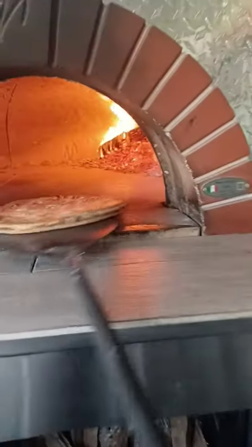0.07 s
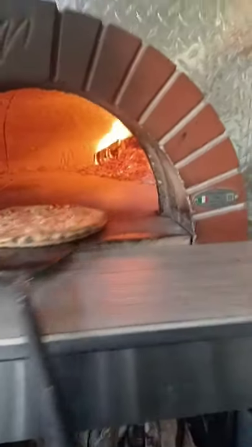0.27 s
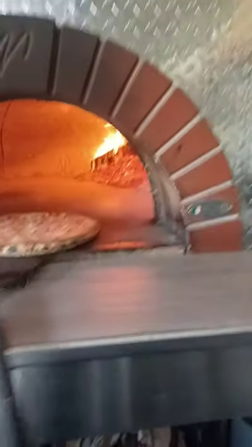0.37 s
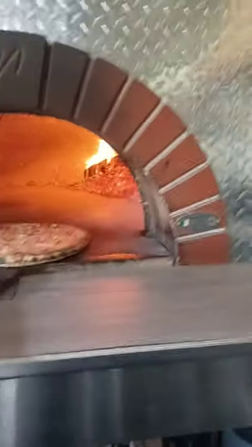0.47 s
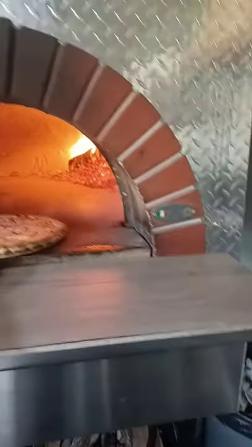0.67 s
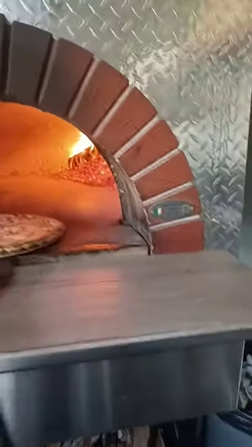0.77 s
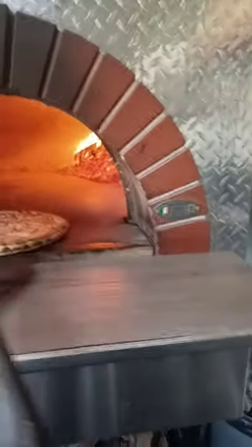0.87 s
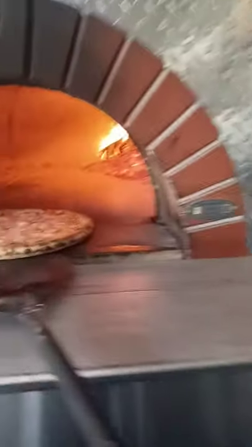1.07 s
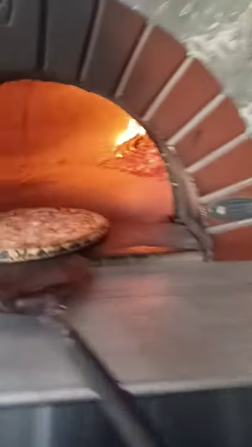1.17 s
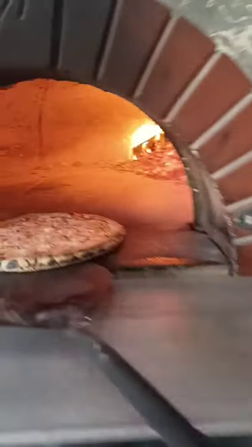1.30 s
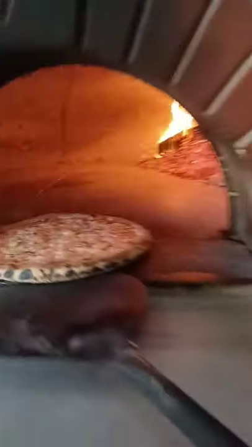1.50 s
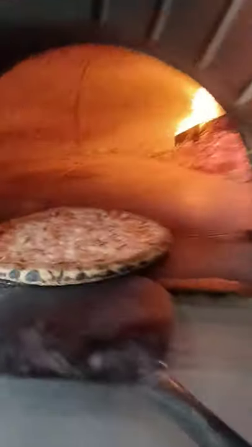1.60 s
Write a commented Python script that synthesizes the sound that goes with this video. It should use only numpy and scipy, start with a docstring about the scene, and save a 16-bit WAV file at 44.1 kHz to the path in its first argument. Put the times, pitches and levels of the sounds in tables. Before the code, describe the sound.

Close by in a small kitchen, a metal blade rasps along a steel counter, pauses briefly with a tiny tick, scrapes again brighter and hissier, then stops; quiet rumble and one soft last brush follow.

```python
"""In a kitchen with a wood oven, a metal pizza peel slides twice over a steel ledge, then brushes it once.
Random clicks of grit are filtered into a rasp and a treble hiss, and they ring the blade's high modes.
Grit also rings the ledge's lower modes, and a wavering sine makes it sing while the blade presses.
Filtered noise gives the air and rumble behind, with two soft thumps; two microphone ports hear it all."""
import sys
import numpy as np
from scipy import signal
from scipy.fft import rfft, irfft
from scipy.io import wavfile
from scipy.ndimage import uniform_filter1d

SR = 44100
rng = np.random.default_rng(int(sys.argv[2]) if len(sys.argv) > 2 else 0)


def to_wav(sig):
    """Store sig (one row per channel, or 1-D mono) as 16-bit WAV at the path in sys.argv[1].

    Samples outside -1..1 are clipped; the rate is SR.
    """
    pcm = np.clip(np.atleast_2d(sig), -1, 1) * 32767
    pcm = np.round(pcm).astype(np.int16)
    wavfile.write(sys.argv[1], SR, pcm.T)  # frames by channels


N = 72765  # samples, 1.65 s


def gain_of(db):
    """Decibels to amplitude gain."""
    return 10 ** (np.asarray(db) / 20)


def evened(x):
    """Scales to rms 1."""
    return x / np.sqrt(np.mean(x ** 2) + 1e-20)


def read(points, hz):
    """Reads a spectrum table along a log-frequency axis."""
    f, value = np.transpose(points)
    return np.interp(np.log(hz + 1), np.log(f + 1), value)


def curves(rows):
    """Turns every column of a time table into one value per sample."""
    t, *columns = np.transpose(rows)
    return [np.interp(np.arange(N) / SR, t, column) for column in columns]


def colour(x, points):
    """Filters by a dB spectrum, silent up to its first point, at rms 1."""
    size = N + SR // 10
    hz = np.fft.rfftfreq(size, 1 / SR)
    gain = gain_of(read(points, hz)) * (hz > points[0][0])
    return evened(irfft(rfft(x, size) * gain, size)[:N])


def ring(x, hz, width_hz):
    """One resonant mode, fixed or gliding, driven by x, at rms 1."""
    turn = np.exp(2j * np.pi * np.cumsum(hz * np.ones(N)) / SR)
    pole = np.exp(-np.pi * abs(width_hz) / SR)
    # shift the mode down to 0 Hz, smooth there, then shift back up
    return evened((turn * signal.lfilter([1], [1, -pole], x / turn)).real)


WANDER_S = .03


def wander():
    """Random drift of rms 1: noise smoothed twice."""
    size = max(round(WANDER_S * SR), 2)
    return evened(uniform_filter1d(uniform_filter1d(rng.standard_normal(N), size), size))


PATCH_DB = 3  # rms


def patchy(x):
    """Random louder and softer patches in time and frequency, at rms 1."""
    z = signal.stft(x, nperseg=512)[2]
    patches = uniform_filter1d(rng.standard_normal(z.shape), 5, 0)  # along frequency
    patches = uniform_filter1d(patches, 7, 1)  # along time
    return evened(signal.istft(z * gain_of(PATCH_DB * evened(patches)), nperseg=512)[1][:N])


def decay(start, rise, hold, t60):
    """Attack, hold and release envelope, all times in seconds."""
    t = np.arange(N) / SR - start
    return np.clip(t / rise, 0, 1) * gain_of(-60 * np.maximum(t - rise - hold, 0) / t60)


GRIT_PER_S, GRIT_SPREAD_DB = 14000, 0  # mean click rate; a spread of 0 dB makes all clicks equal


def grit():
    """Grit under the metal as dense tiny clicks of random sign."""
    size = gain_of(GRIT_SPREAD_DB * np.minimum(rng.exponential(1, N), 5))
    sign = np.sign(rng.standard_normal(N))
    hits = rng.random(N) < GRIT_PER_S / SR
    return evened(size * sign * hits)


AIR_DB, AIR_DRIFT_DB = -63.5, 1.1
# Colour of kitchen air and fire: (frequency [Hz], relative density [dB per Hz])
AIR_COLOUR = [(100, -52), (170, -28.5), (270, -7), (302, -22.5), (338, -21.5), (455, -23.5), (690, -28),
              (905, -15), (1650, -20.5), (2500, -43.5), (4150, -33.5), (14400, -42)]


def air():
    """Quiet kitchen air and fire: patchy coloured noise, its level drifting a little."""
    return gain_of(AIR_DB + AIR_DRIFT_DB * wander()) * patchy(colour(rng.standard_normal(N), AIR_COLOUR))


# Oven and kitchen rumble over time: (time [s], hum level [dB], roar level [dB])
RUMBLE_LEVELS = [(0.0, -57, -54.5), (0.45, -58, -53), (1.074, -60, -59), (1.106, -66, -61.5),
                 (1.289, -61, -73), (1.388, -83, -67), (1.474, -71, -63.5), (1.65, -64, -63)]
# Resonances of the hum, then of the roar: (frequency [Hz], half the width of each pass [Hz], level [dB])
RUMBLE_MODES = [
    [(55, 9, 0)],
    [(87, 12, 0), (135, 30, -1)],
]


def rumble():
    """Noise rings a low hum and an uneven roar of two resonances above it."""
    noise = rng.standard_normal(N)
    total = 0
    for level_db, modes in zip(curves(RUMBLE_LEVELS), RUMBLE_MODES):
        # each resonance is rung twice for steeper skirts
        band = sum(gain_of(db) * ring(ring(noise, hz, 2 * w), hz, 2 * w) for hz, w, db in modes)
        total = total + gain_of(level_db) * evened(band)
    return total


THUMP_HZ, THUMP_S = 87.96, 0.037
# Soft low thumps: (time [s], peak level [dB])
THUMPS = [(1.005, -48), (1.245, -53.5)]


def thumps():
    """Soft bell-shaped swells of one low tone."""
    t = np.arange(N) / SR
    swells = sum(gain_of(db) * np.exp(-((t - s) / THUMP_S) ** 2) for s, db in THUMPS)
    return swells * np.sin(2 * np.pi * THUMP_HZ * t)


CHATTER_HZ, CHATTER_WAVER, CHATTER_FLUTTER_DB = 230, .012, 2.5  # waver is a share of the pitch
# How the ledge sounds over time: (time [s], chatter tone level [dB], lowest ring level [dB],
# low ring level [dB], middle ring level [dB], upper ring level [dB], upper ring centre [Hz])
LEDGE = [(0.0, -55, -58, -50.5, -65, -60, 1090), (0.102, -75, -53.5, -58.5, -75, -57, 1106),
         (0.184, -46, -53, -47.5, -58.5, -67, 1050), (0.248, -41, -42.5, -55.5, -64.5, -52, 1100),
         (0.308, -49, -54.5, -43, -54.5, -45, 1040), (0.37, -35.5, -53, -48.5, -45.5, -42.5, 1100),
         (0.41, -36.5, -36.5, -41.5, -59, -44, 960), (0.464, -32, -53, -58, -55, -48, 1010),
         (0.604, -55, -56.5, -64, -81, -63, 1070), (0.708, -63, -58.5, -86, -69, -59.5, 980),
         (0.782, -65, -52.5, -59, -68, -47.5, 977), (1.012, -61.5, -63.5, -77, -58, -48.5, 916),
         (1.12, -77, -69.5, -82, -99, -73, 1000)]
# Closing row of the same table, same columns
LEDGE_END = (1.2, -95, -95, -95, -95, -95, 900)


def chatter():
    """The ledge sings one low, nearly pure, wavering tone while the blade presses on it."""
    turns = np.cumsum(CHATTER_HZ * (1 + CHATTER_WAVER * wander())) / SR + rng.random()
    level_db = curves(LEDGE + [LEDGE_END])[0] + CHATTER_FLUTTER_DB * wander()
    return np.sqrt(2) * gain_of(level_db) * np.sin(2 * np.pi * turns)


UPPER_WIDTH_HZ, UPPER_WAVER = 210, .025  # waver is a share of the pitch
# Modes of the lowest, low and middle ring: (frequency [Hz], first-pass width [Hz], level [dB])
LEDGE_MODES = [
    [(272, 16, 0), (345, 70, -4)],
    [(490, 35, 0), (555, 40, -2)],
    [(726, 30, 0)],
]


def ledge():
    """Grit rings the lower modes of the ledge; the upper ring shifts with the contact point."""
    drive = grit()
    _, *rings_db, upper_db, upper_hz = curves(LEDGE + [LEDGE_END])
    steady = 0
    for level_db, modes in zip(rings_db, LEDGE_MODES):
        # the second pass, four times wider, steepens the skirts
        band = sum(gain_of(db) * ring(ring(drive, hz, w), hz, 4 * w) for hz, w, db in modes)
        steady = steady + gain_of(level_db) * evened(band)
    upper_hz = upper_hz * (1 + UPPER_WAVER * wander())
    upper = ring(ring(drive, upper_hz, UPPER_WIDTH_HZ), upper_hz, UPPER_WIDTH_HZ)
    return steady + gain_of(upper_db) * upper


BRUSH_S, BRUSH_DB, BRUSH_RISE_S, BRUSH_HOLD_S, BRUSH_T60_S = 1.537, -59, .007, .025, .3
DRONE_DB, DRONE_HZ, DRONE_WIDTH_HZ, DRONE_RISE_S = -62, 261, 18, 0.039
# Colour of the last light brush: (frequency [Hz], relative density [dB per Hz])
BRUSH_COLOUR = [(1500, -69), (2000, -3.5), (2500, -13.5), (3600, -16), (4600, 3.5), (6000, -3.5),
                (8000, -13), (10000, -64)]


def brush():
    """A light touch: a short rasp of grit, while a low ledge mode swells in more slowly and holds."""
    envelope = decay(BRUSH_S, BRUSH_RISE_S, BRUSH_HOLD_S, BRUSH_T60_S)
    rasp = gain_of(BRUSH_DB) * envelope * colour(grit(), BRUSH_COLOUR)
    drone = ring(grit(), DRONE_HZ, DRONE_WIDTH_HZ)
    return rasp + gain_of(DRONE_DB) * decay(BRUSH_S, DRONE_RISE_S, 1, 1) * drone


GRIT_DB, HISS_DB, HISS_FROM_HZ = -5, -0.5, 6500  # rasp level, trim on the treble column, split point
BLADE_DB, BLADE_WIDTH_HZ = -23.5, 75  # level of each mode outside the bites
BEND, WANDER_DB = .004, 3  # drift of each mode: share of its pitch, and level
BITE_S, BITE_WIDTH_HZ = .025, 220  # reach of a bite in time and pitch
TICK_S, TICK_DB, TICK_T60_S = .6235, -37, .08
# The two slides over time: (time [s], scrape level [dB], treble boost before trim [dB])
STROKE = [(0, -46.5, -1), (.04, -41, 0), (.17, -39.5, -2), (.255, -40.5, 0), (.268, -35.5, 7),
          (.295, -29, 2), (.36, -31, 4), (.404, -28, -5.5), (.416, -23.5, 4.5), (.458, -25, 9),
          (.49, -25.5, 6.5), (.515, -29, 9.5), (.6, -39, -5.5), (.62, -51, -1), (.66, -44, 6.5),
          (.71, -34, 2.5), (.74, -30, 7.5), (.762, -29, 2), (.795, -35.5, 11.5), (.836, -31, 4.5),
          (.896, -30, 8.5), (.918, -30.5, 9.5), (.96, -34, 7), (.99, -37, 12.5), (1.03, -44, 5.5),
          (1.075, -76, 8), (1.16, -102, 8)]
# Broad colour of the grit: (frequency [Hz], relative density [dB per Hz])
GRIT_COLOUR = [(1200, -40), (1450, -6), (1600, -22.5), (2000, -4), (2400, -4.5), (2800, -7), (4300, 1),
               (6000, -7), (8300, -10.5), (12800, -8), (14400, -7.5)]
# Modes of the blade: frequency [Hz]
BLADE_HZ = [1670, 2010, 2780, 3050, 3490, 3680, 3960, 4200, 4570, 4735, 5390, 5750, 6460]
# The blade bites and modes near one pitch flare up: (time [s], frequency [Hz], rise [dB])
BITES = [(.29, 4500, 9), (.335, 3490, 8), (.39, 3680, 13), (.43, 2010, 11), (.46, 4200, 13),
         (.46, 5390, 14), (.475, 2780, 13), (.70, 4500, 14), (.76, 4030, 17), (.79, 2010, 11),
         (.87, 4570, 13), (.905, 5750, 15), (.895, 3490, 13), (.915, 4700, 17), (.925, 1670, 13),
         (1.0, 4200, 19)]


def scrape():
    """Grit gives a rasp, a treble hiss, the blade's ringing modes and one short tick."""
    level_db, treble_db = curves(STROKE + [(1.3, -120, 0)])
    drive, t = grit(), np.arange(N) / SR
    broad = patchy(colour(drive, GRIT_COLOUR))
    highpass = signal.butter(2, HISS_FROM_HZ, "high", fs=SR, output="sos")
    hiss = signal.sosfiltfilt(highpass, broad)
    out = gain_of(GRIT_DB) * (broad - hiss + hiss * gain_of(treble_db + HISS_DB))
    for hz in BLADE_HZ:
        bite_db = sum(db * np.exp(-((hz - f) / BITE_WIDTH_HZ) ** 2 - ((t - s) / BITE_S) ** 2)
                      for s, f, db in BITES)
        mode = ring(drive, hz * (1 + BEND * wander()), BLADE_WIDTH_HZ)
        out += gain_of(BLADE_DB + bite_db + WANDER_DB * wander()) * mode
    tick = gain_of(TICK_DB) * decay(TICK_S, 0.00048, 0, TICK_T60_S) * broad
    return gain_of(level_db) * out + tick


ROOM_T60_S, ROOM_DB = 0.27, -11.5


def room(x):
    """Adds reverberation: a short decaying noise tail starting after 5 ms."""
    t = np.arange(SR // 2) / SR
    tail = rng.standard_normal(len(t)) * gain_of(-60 * t / ROOM_T60_S) * (t > .005)
    return x + gain_of(ROOM_DB) * signal.fftconvolve(x, tail / np.linalg.norm(tail))[:N]


SCATTER_RAD, SCATTER_FROM_HZ, SCATTER_S = 2.2, 600, .002  # phase depth, onset, longest ripple delay
SIDE_DB = -19
# Likeness of the two ports: (frequency [Hz], shared amplitude [0 to 1])
SAME = [(60, .98), (400, .95), (750, .5), (1500, .45), (5000, .5), (14000, .4)]
# Level balance of the two ports: (frequency [Hz], left minus right [dB])
LEAN = [(60, 3), (130, -3.5), (290, -2), (630, 1), (1370, 2), (2990, -6), (6550, -1.5), (14300, 1.5)]


def scene():
    """Two microphone ports hear a shared sound plus an unrelated share, shifted in phase and level."""
    size = N + SR // 10
    hz = np.fft.rfftfreq(size, 1 / SR)
    # two independent draws of the same layers, blended below
    a, b = (rfft(room(scrape() + ledge() + brush()) + air(), size) for _ in "ab")
    bass = rfft(chatter() + rumble() + thumps(), size)
    side = rfft(gain_of(SIDE_DB) * rumble(), size)  # opposite polarity in the two ports
    same, lean = read(SAME, hz), gain_of(read(LEAN, hz) / 2)
    ripples = rng.random((12, 2))
    scatter = evened(sum(np.cos(2 * np.pi * (hz * SCATTER_S * d + p)) for d, p in ripples))
    phase = SCATTER_RAD * scatter * hz ** 2 / (hz ** 2 + SCATTER_FROM_HZ ** 2)
    right = (same * a + np.sqrt(1 - same ** 2) * b) * np.exp(1j * phase)
    ports = np.array([(a + bass + side) * lean, (right + bass - side) / lean])
    return irfft(ports, size)[:, :N]


EDGE_HZ = 14350


def record(dry):
    """Limits the band with a steep linear-phase lowpass."""
    lowpass = signal.firwin(511, EDGE_HZ, window=("kaiser", 9), fs=SR)
    return signal.oaconvolve(dry, lowpass[None], "same")


dry = scene()
out = record(dry)
to_wav(out)
```